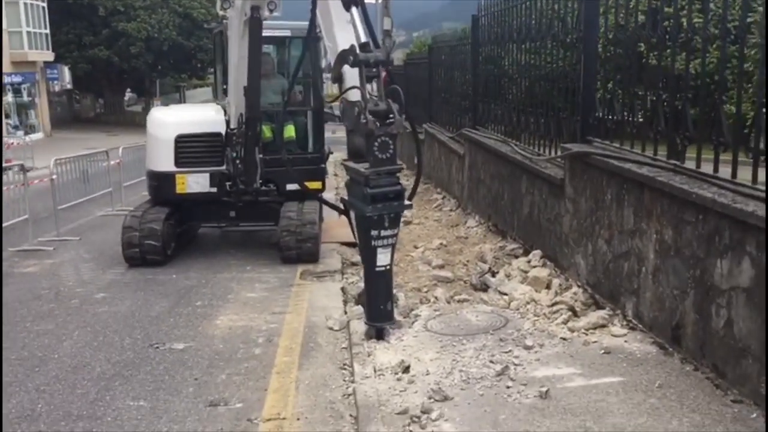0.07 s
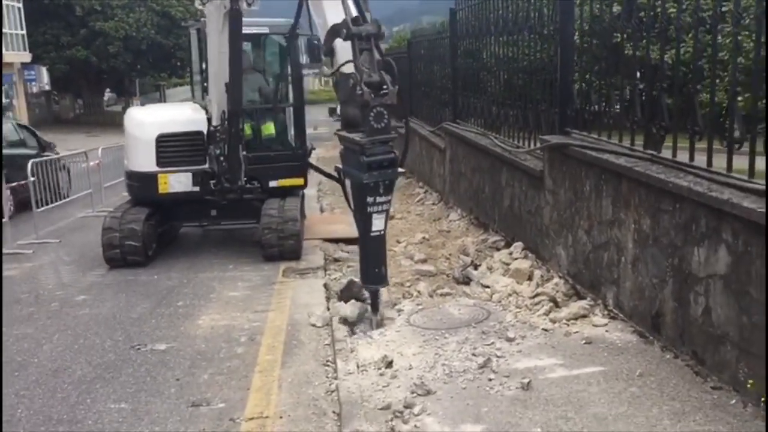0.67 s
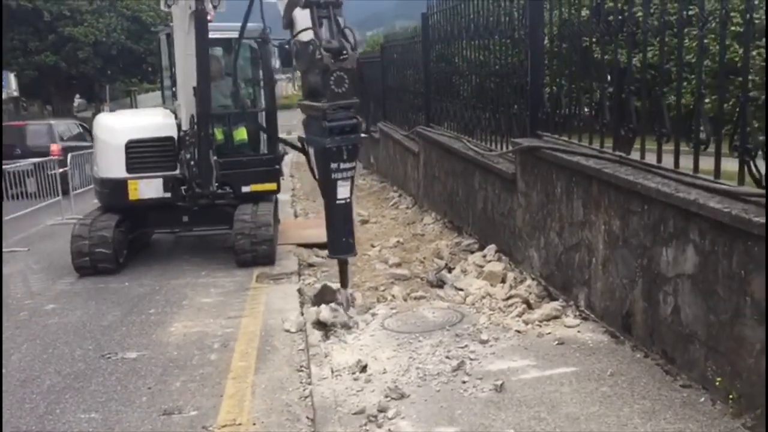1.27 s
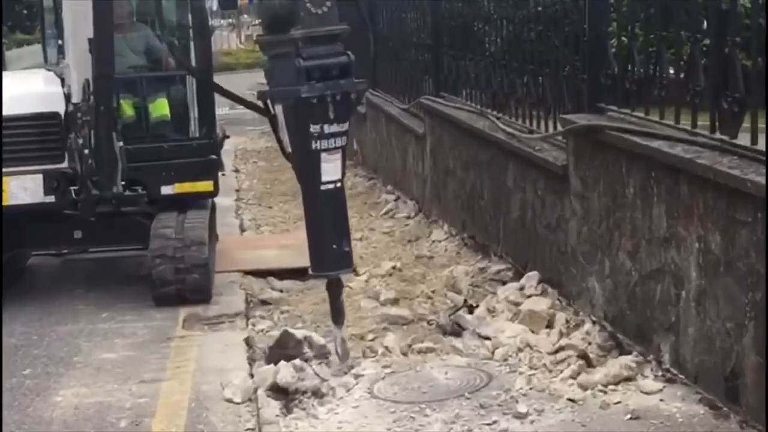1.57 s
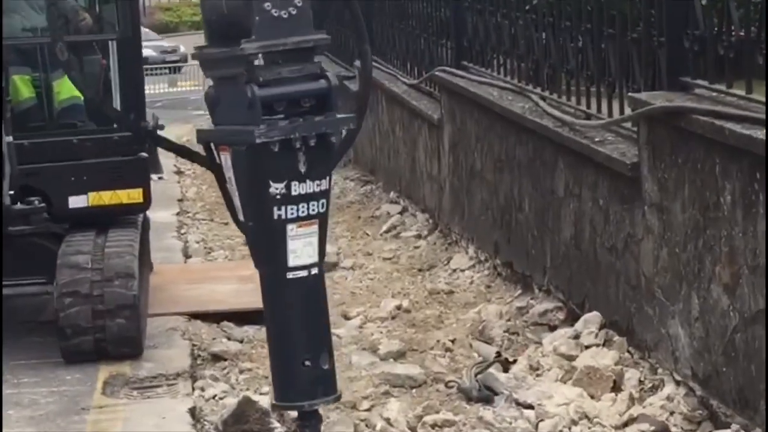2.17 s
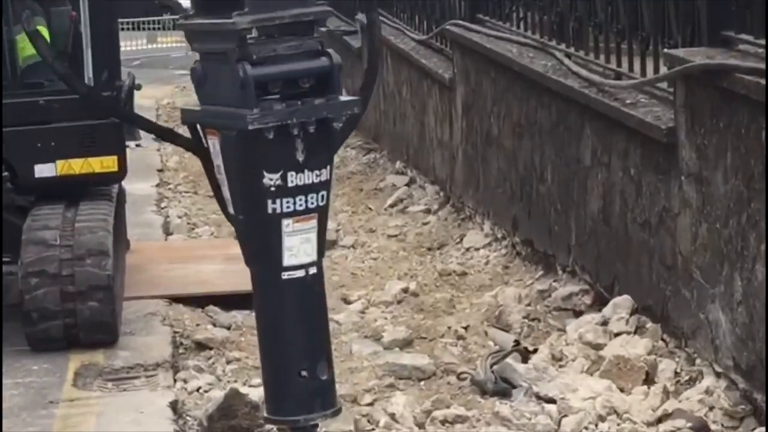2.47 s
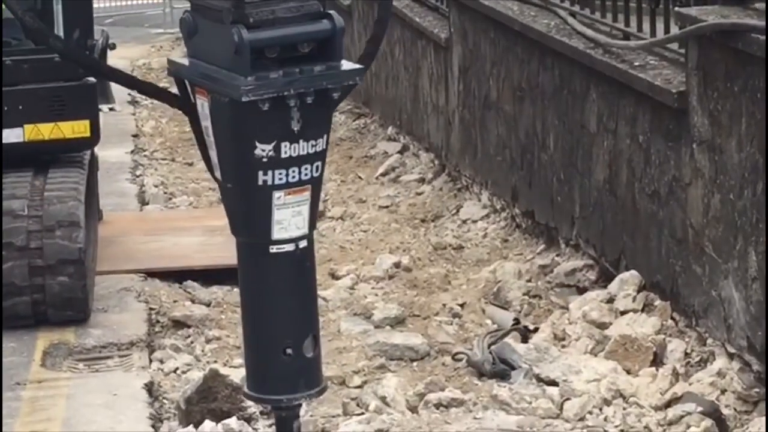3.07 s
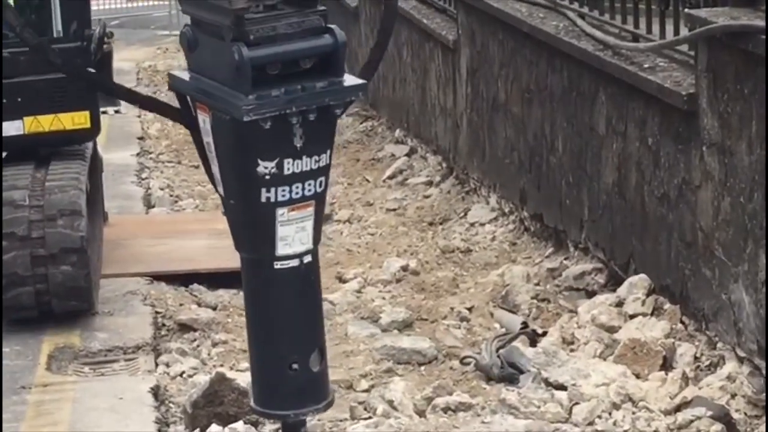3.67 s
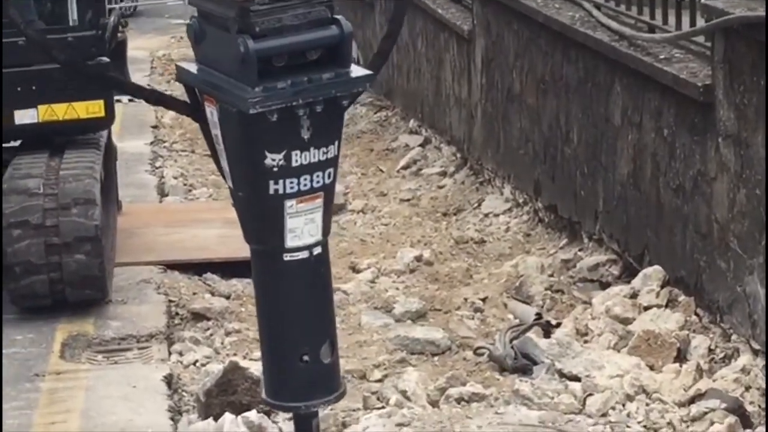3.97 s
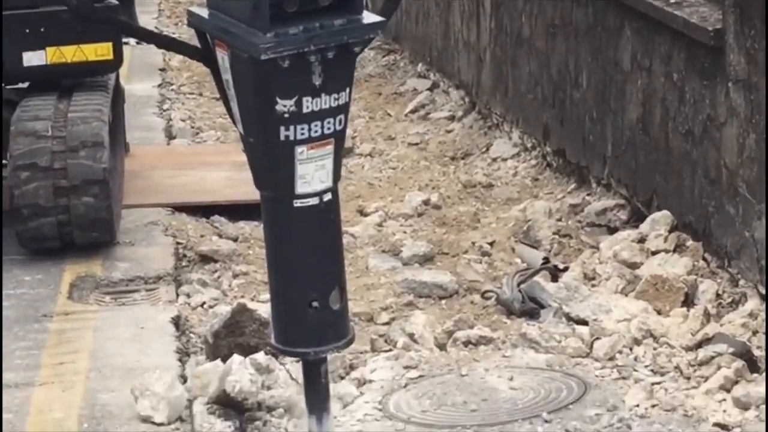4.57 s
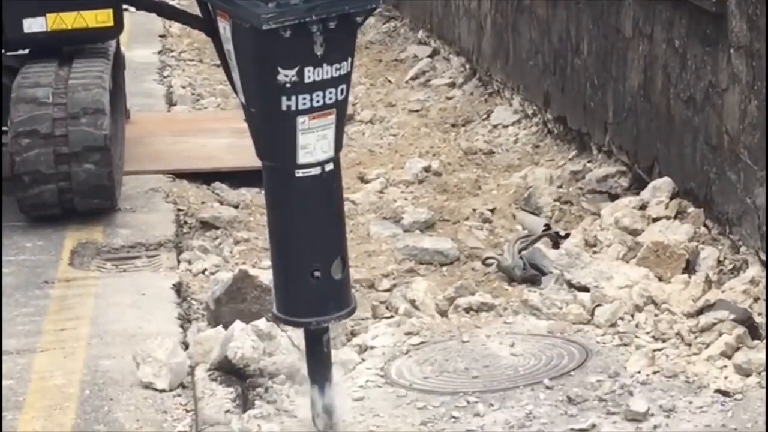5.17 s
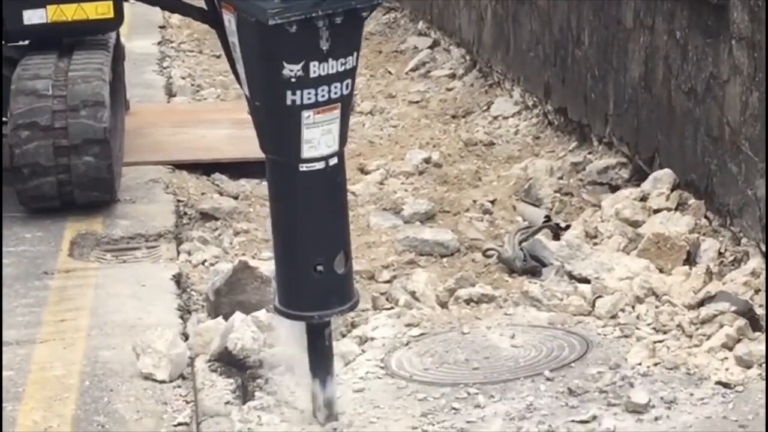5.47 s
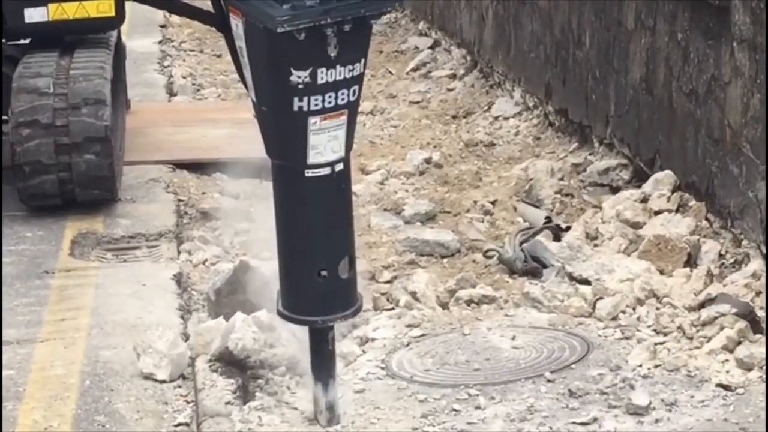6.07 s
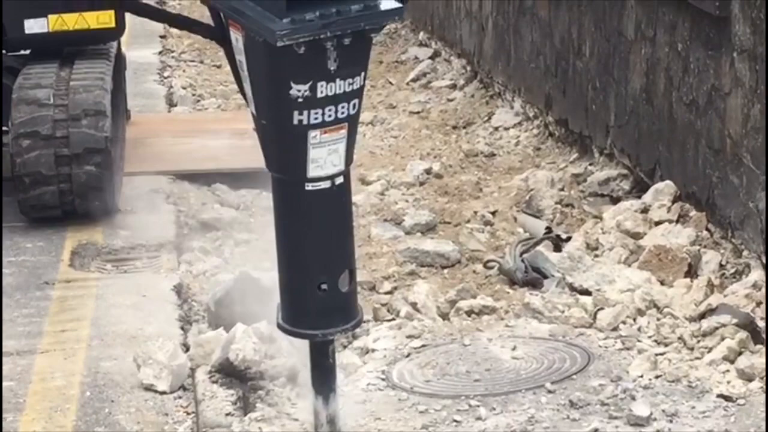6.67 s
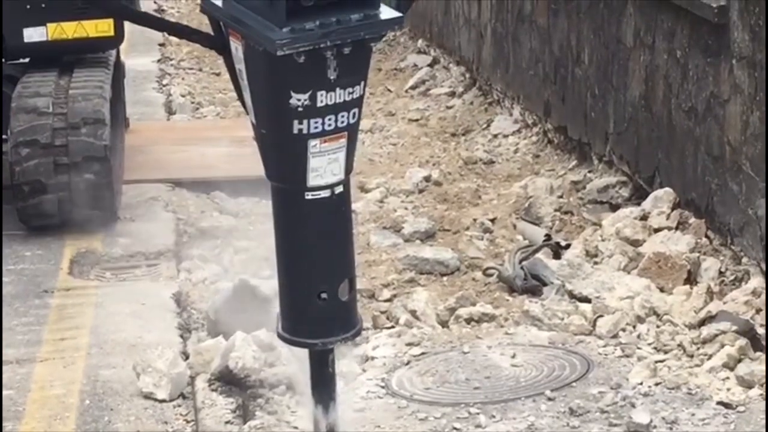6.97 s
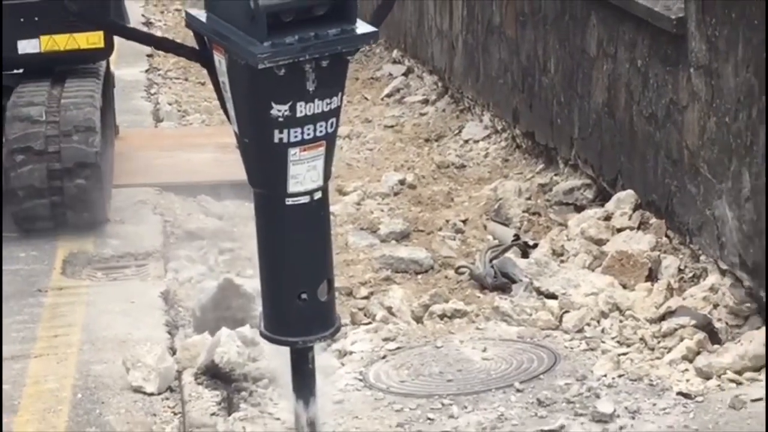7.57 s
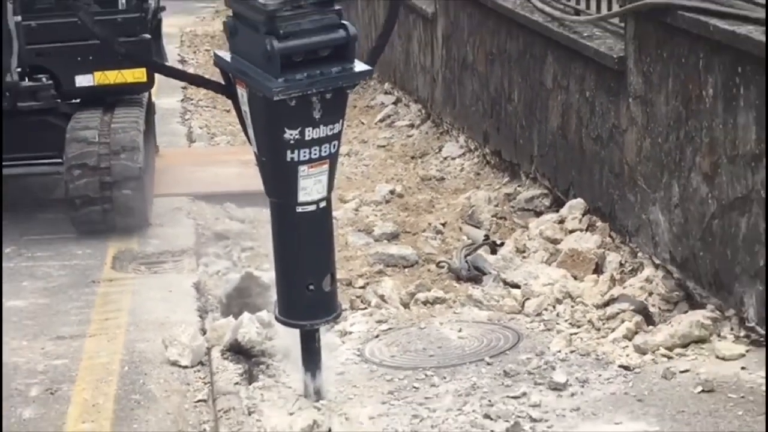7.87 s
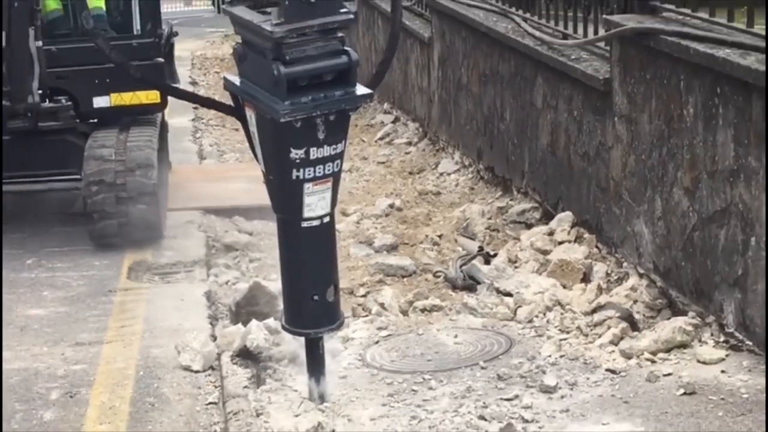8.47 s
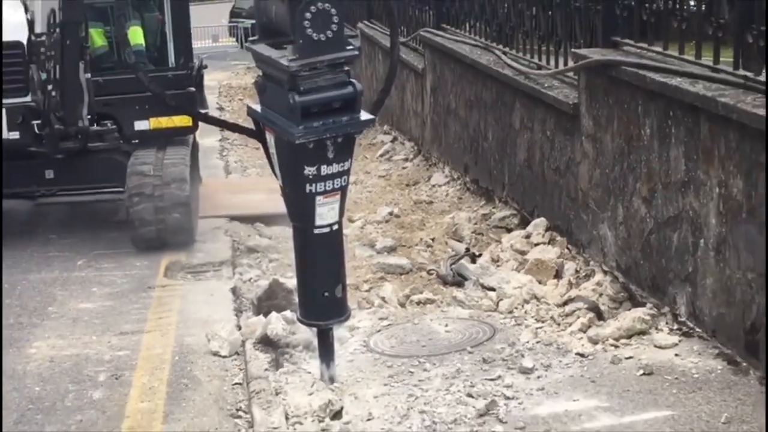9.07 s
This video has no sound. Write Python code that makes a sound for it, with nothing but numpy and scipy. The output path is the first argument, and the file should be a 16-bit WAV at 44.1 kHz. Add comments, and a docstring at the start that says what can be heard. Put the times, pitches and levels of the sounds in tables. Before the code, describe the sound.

Low diesel idle and a few scrapes and knocks of stone give way to a hydraulic breaker pounding pavement in an echoing street.

```python
"""A street between house fronts, one microphone a few metres in front of a small excavator.
The diesel idles while a car rolls by, its brake squealing faintly. The hydraulic breaker nudges rubble
aside and sets its chisel down, then hammers the pavement about 14 times a second, each blow nearly like
the last: a thump, a clatter of the housing, ringing steel. The ring changes as the chisel works from
the crust through a crack into the bed; a wall and the house fronts throw the blows back."""
import sys
import numpy as np
from scipy import signal
from scipy.fft import rfft, irfft, next_fast_len
from scipy.io import wavfile

SR = 44100
rng = np.random.default_rng(int(sys.argv[2]) if len(sys.argv) > 2 else 0)


def generate_wav(sig):
    """Save sig (samples, or channels by samples) to the path in sys.argv[1] as 16-bit PCM at SR."""
    pcm = np.round(np.clip(np.atleast_2d(sig).T, -1, 1) * 32767).astype(np.int16)
    wavfile.write(sys.argv[1], SR, pcm)


N = 411453
TIME = np.arange(N) / SR


def from_db(db):
    """Decibels to gain."""
    return 10 ** (np.asarray(db) / 20)


def rms_one(x):
    """Scale to rms 1."""
    return x / np.sqrt(np.mean(x ** 2) + 1e-20)


def add(out, s, sound):
    """Mix a sound in at time s."""
    at = int(round(s * SR))
    out[at:at + len(sound)] += sound[:N - at]


def dying(age, t60):
    """Falls 60 dB in t60, silent before age 0."""
    return from_db(-60 * np.maximum(age, 0) / t60) * (age >= 0)


def ring(age, hz, t60):
    """A struck mode."""
    return np.sin(2 * np.pi * hz * age) * dying(age, t60)


def swell(start_s, hold_s, t60, attack_s=0.0061):
    """Envelope of a short rise, a hold and a dying release."""
    rise = np.clip((TIME - start_s) / attack_s, 0, 1)
    return rise * dying(np.clip(TIME - start_s - hold_s, 0, 3 * t60), t60)


def coloured(x, spectrum):
    """Minimum-phase filter shaped by (frequency [Hz], level [dB]), rolling off below the first row."""
    size = 2 * next_fast_len(len(x) // 2 + 512)
    hz, db = np.transpose(spectrum)
    f = np.maximum(np.fft.rfftfreq(size, 1 / SR), 1)
    gain = from_db(np.interp(np.log(f), np.log(hz), db)) / (1 + (hz[0] / 2 / f) ** 2)
    cepstrum = irfft(np.log(gain))
    cepstrum[1:size // 2] *= 2
    cepstrum[size // 2 + 1:] = 0
    return irfft(rfft(x, size) * np.exp(rfft(cepstrum)))[:len(x)]


def narrow_noise(hz, width_hz):
    """Noise twice through one resonance; rms 1."""
    b, a = signal.iirpeak(hz, hz / width_hz, fs=SR)
    return rms_one(signal.lfilter(b, a, signal.lfilter(b, a, rng.standard_normal(N))))


def at_time(curve, s):
    """Value of a curve at time s."""
    return np.interp(s, *np.transpose(curve))


def at_stage(columns, stage):
    """Blend three level columns by the chisel's stage: 0 on the crust, 1 cracking, 2 wedged in the bed."""
    return columns @ np.maximum(1 - abs(np.clip(stage, 0, 2) - np.arange(columns.shape[1])), 0)


def excavator(firing_hz=49.6, hunting_hz=1.0, tone_db=-50.5, noise_db=-46.5, cover_db=-58, throb=0.16,
              load_s=3.98, load_rise_s=0.14, load_db=6.5):
    """Firing tones of the governed diesel; combustion, fan and droning cover throb at the firing rate."""
    # combustion and fan noise: (frequency [Hz], relative level [dB])
    spectrum = [(18, -17), (30, 13), (55, -12), (70, -7), (102, -5), (125, -14), (229, -10), (333, -19),
                (497, -33.5), (863, -26), (1580, -27.5), (1740, -26), (2350, -29), (4630, -54),
                (12000, -60), (15600, -88), (22000, -120)]
    phase = 2 * np.pi * np.cumsum(firing_hz + hunting_hz * narrow_noise(2.6, 3.8)) / SR
    waver_db = narrow_noise(2, 5.9)
    firing = from_db(tone_db + waver_db / 2) * np.sin(phase)
    octave = from_db(tone_db + waver_db) * np.sin(2 * phase)
    noise = coloured(rng.standard_normal(N), spectrum)
    noise = from_db(noise_db) * rms_one(signal.lfilter(*signal.butter(2, 100, "high", fs=SR), noise))
    cover = from_db(cover_db) * narrow_noise(1033, 107)
    load = from_db(load_db * np.clip((TIME - load_s) / load_rise_s, 0, 1))   # the breaker draws oil
    return np.sqrt(2) * (firing + octave) + load * (noise + cover) * (1 + throb * np.cos(phase))


def car_tyres(level_db=-45.5):
    """Tyre noise of the passing car, fading as it leaves."""
    # tyres on the road: (frequency [Hz], relative level [dB])
    spectrum = [(150, 1), (300, 5), (550, -10), (1000, -0.5), (1500, -2.5), (2200, -23), (3200, -51),
                (6000, -35.5), (12000, -61.5)]
    rolling = rms_one(coloured(rng.standard_normal(N), spectrum))
    return from_db(level_db) * swell(0, hold_s=1, t60=3.2) * rolling


def brake_squeal(hz=1470, rise_hz_per_s=170, waver_hz=6, level_db=-41.5, overtone_db=-17):
    """A brake squeals faintly: a rising, unsteady tone with rasping overtones."""
    pressure = swell(0, hold_s=0.095, t60=1)
    phase = 2 * np.pi * np.cumsum(hz + rise_hz_per_s * TIME + waver_hz * narrow_noise(30, 40)) / SR
    overtones = pressure * np.sin(2 * phase) + from_db(-9) * narrow_noise(3900, 1500)
    rasp = 1 + 0.43 * narrow_noise(150, 400)
    return from_db(level_db) * pressure * (np.sin(phase) + from_db(overtone_db) * overtones * rasp)


def drags(relative_width=0.23, grain_db=6.0):
    """Each lump grinds over the pavement in uneven grains around a pitch of its own."""
    # dragged lumps: (centre time [s], half length [s], level [dB], pitch [Hz])
    lumps = [(.6, 0.022, -49, 1900), (0.748, 0.046, -44.5, 1390), (0.98, 0.061, -61, 2150),
             (1.134, 0.014, -37, 2300), (2.372, 0.03, -39, 1140), (2.488, 0.075, -49, 2080),
             (3.07, 0.028, -47, 1230), (3.222, 0.025, -42, 1410)]
    out = np.zeros(N)
    grains = rms_one(from_db(grain_db * narrow_noise(113, 200)))
    for s, half_s, db, hz in lumps:
        envelope = np.exp(-np.minimum(((TIME - s) / half_s) ** 2, 50))
        out += from_db(db) * envelope * narrow_noise(hz, relative_width * hz)
    return out * grains


def knocks(crunch_t60=0.1, tail_db=-22, tail_t60=0.69, rubble_db=-10, pitch_db=-7, treble_follow=0.83):
    """The loose chisel bumps on rubble: a noisy crunch and the dry clack of the lumps."""
    # chisel and stones knocking: (time [s], level [dB], nominal treble [dB], main pitch [Hz])
    hits = [(0.773, -31.5, -46, 1266), (0.967, -26.5, -30, 2130), (1.011, -33, -32, 2090),
            (1.125, -29, -26, 2430), (2.402, -20, -2, 1063), (2.471, -32.5, -13, 1080),
            (2.971, -31.5, -57, 927), (3.038, -32, -17, 980), (3.081, -23, -30, 1350),
            (3.12, -23.5, -36, 1370), (3.211, -31, -20, 1340), (3.647, -21, -40, 1036),
            (3.674, -29.5, -36, 813), (3.825, -32.5, -11, 978)]
    # spectrum of the crunch: (frequency [Hz], level [dB])
    crunch_spectrum = [(100, -5), (350, 3), (600, -9), (1000, 6.5), (1500, -4), (2300, 2.5), (3500, -9.5),
                       (6000, -24.5), (12000, -35)]
    # modes of concrete lumps: (frequency [Hz], level [dB], t60 [s])
    lump_modes = [(1050, -4.5, 0.14), (1370, -11, 0.14), (2150, -23, .07), (2590, -22, 0.061),
                  (3380, -35.5, .04), (5550, -31, 0.074)]
    out, age = np.zeros(N), np.arange(SR // 3) / SR
    hz, db = np.transpose(crunch_spectrum)
    treble = np.clip(np.log2(hz / 2000), 0, 1)
    attack = 1 - np.exp(-age / 0.00065)
    envelope = attack * (dying(age, crunch_t60) + from_db(tail_db) * dying(age, tail_t60))
    for s, hit_db, treble_db, pitch_hz in hits:
        colour = db + treble * treble_follow * (treble_db + 11.5)
        crunch = coloured(rng.standard_normal(len(age)) * envelope, np.c_[hz, colour])
        lumps = sum(from_db(level + rng.normal(0, 3.4)) * ring(age, f * rng.normal(1, 0.034), t60)
                    for f, level, t60 in lump_modes)
        clack = from_db(rubble_db) * lumps + from_db(pitch_db) * ring(age, pitch_hz, t60=0.11)
        add(out, s, from_db(hit_db) * (crunch + clack))
    return out


def valve(level_db=-69):
    """A hydraulic valve gives one thin, high whistle."""
    return from_db(level_db) * swell(2.135, hold_s=0.065, t60=0.25) * narrow_noise(7850, 350)


def bumps():
    """A few soft, low bumps, each a quickly damped tone."""
    # bumps: (time [s], level [dB], pitch [Hz])
    thuds = [(2.213, -24.5, 100), (2.292, -25.5, 100), (6.624, -16, 60), (7.018, -20, 60)]
    out = np.zeros(N)
    for s, db, hz in thuds:
        add(out, s, from_db(db) * ring(TIME[:SR // 4], hz, t60=0.047))
    return out


def grate(level_db=-43, judder_db=3):
    """Steel grates over stone: a narrow, juddering tone."""
    judder = from_db(level_db + judder_db * narrow_noise(26, 60))
    return judder * swell(2.935, hold_s=0.18, t60=0.47) * narrow_noise(1370, 76)


def chisel_on_concrete(width_hz=1300):
    """The chisel is set down with a dull knock; later, concrete gives way in short, bright cracks."""
    # the set-down knock, then two cracks: (time [s], level [dB], centre frequency [Hz], t60 [s])
    bursts = [(3.648, -44, 1050, 0.096), (3.9728, -8.5, 3250, 0.021), (5.67, -24.5, 1900, 0.4)]
    return sum(from_db(db) * narrow_noise(hz, width_hz) * dying(np.minimum(TIME - s, 2), t60)
               for s, db, hz, t60 in bursts)


def blows(blows_per_s=14, unseated_db=-3.5, seating_s=0.59):
    """Every piston blow as (time [s], stage, strength [dB], thump [dB], hardness [dB])."""
    # the piston cycles evenly, its pace shifting a little between runs: (first blow [s], last blow [s])
    runs = [(4.263, 4.4074), (4.4732, 5.4524), (6.2455, 6.3895), (6.4575, 6.8828), (6.9552, 7.241),
            (7.3142, 7.8909), (7.9619, 8.8892), (8.9613, 9.32)]
    # slow blows at the start and as the chisel drops through the crack: (time [s])
    single_blows = [3.9716, 4.0817, 4.182, 5.548, 5.6644, 5.7734, 5.8666, 5.9551, 6.0516, 6.1527]
    # progress of the chisel: (time [s], stage [0 crust, 1 cracking, 2 wedged])
    progress = [(3.9, 0), (5.4, 0), (5.65, 1.33), (6.2, 1.06), (7.0, 1.55), (7.4, 2.23), (9.33, 1.82)]
    # force of the blows: (time [s], level [dB])
    force = [(3.97, -15.5), (4.68, -15.5), (5.31, -15.0), (5.55, -15.5), (5.87, -13.5), (6.15, -15.5),
             (7.03, -14), (8.03, -14.5), (8.5, -15)]
    # hard stone answers brighter and more abruptly: (time [s], hardness [dB])
    hardness = [(3.97, -8.5), (4.5, -11), (4.8, -1), (5.38, -4.7), (5.55, -7), (6.05, -11), (6.4, -6),
                (6.8, -3.7), (7.24, 4), (7.7, -4), (9.32, -1.8)]
    # level of the thump: (crust [dB], cracking [dB], wedged [dB])
    thump_levels = [-21.5, -21.5, -19.5]
    steady = [np.linspace(first, last, 1 + round((last - first) * blows_per_s)) for first, last in runs]
    s = np.sort(np.concatenate([single_blows, *steady]))
    stage = at_time(progress, s)
    strength_db = at_time(force, s) + rng.normal(0, 0.41, len(s))
    unseated = np.exp(-((s - s[0]) / seating_s) ** 2)   # until the boom has pressed the breaker home
    thump_db = np.interp(stage, [0, 1, 2], thump_levels) + unseated_db * unseated
    thump_db += rng.normal(0, 0.06, len(s))
    hardness_db = at_time(hardness, s) + rng.normal(0, 1, len(s))
    return zip(s, stage, strength_db, thump_db, hardness_db)


def blow_envelope(age, rattle_s, release_t60, wall_db, street_db, street_t60, wall_s=0.013):
    """Chatter while the piston is in contact, its echo off the wall, then the tail of the street."""
    direct = dying(np.maximum(age - rattle_s, 0), release_t60)
    wall = from_db(wall_db) * dying(age - wall_s, t60=0.097)
    street = from_db(street_db) * dying(age, street_t60)
    attack = 1 - np.exp(-age / 0.00035)
    return attack * np.sqrt(direct ** 2 + wall ** 2 + street ** 2)


def heave(age, low_cut_hz=75):
    """The thump: the casing jumps, then the ground answers; both are too small to radiate deep bass."""
    # casing and ground: (delay after the blow [s], frequency [Hz], level [dB], t60 [s])
    modes = [(0.0021, 251, 7, 0.014), (0.00711, 133, 11.5, 0.023), (0.0022, 344, 2, 0.045)]
    push = sum(from_db(db) * ring(age - delay, hz, t60) for delay, hz, db, t60 in modes)
    return signal.sosfilt(signal.butter(3, low_cut_hz, "high", fs=SR, output="sos"), push)


def clatter(drive, stage, hardness_db, treble_follow=0.52, low_cut_hz=190):
    """The broad rattle of the housing, brighter on hard stone."""
    # spectrum of the rattle: (frequency [Hz], crust [dB], cracking [dB], wedged [dB])
    spectrum = [(100.0, 11.5, -2, 6.5), (182, -15, -3.5, -3.5), (354, 0, -8.5, -9),
                (452, -14.5, -11.5, -7.5), (663, -8.5, -19, -17.5), (853, -14, -3, -1.5),
                (1330, -2, -16, -18), (1900.0, -9.5, -12, -8.5), (2750, -11.5, -20, -14.5),
                (3830, -21.5, -10, -19), (5000, -14, -24, -9), (6370, -12, -21, -29),
                (9700, -16, -18.5, -26), (12300, -27.5, -29.5, -29.5)]
    bands = np.array(spectrum)
    treble = np.clip(np.log2(bands[:, 0] / 2000), 0, 1)
    colour = at_stage(bands[:, 1:], stage) + treble * treble_follow * hardness_db
    rattle = coloured(drive, np.c_[bands[:, 0], colour])
    return signal.lfilter(*signal.butter(2, low_cut_hz, "high", fs=SR), rattle)


def steel(drive, stage, looseness, scatter_db=2.5, detune=0.013, narrowing=0.89):
    """Chatter sets the steel ringing; a loose chisel shifts each mode's level and pitch on every blow."""
    # chisel and housing: (frequency [Hz], nominal width [Hz], crust [dB], cracking [dB], wedged [dB])
    resonances = [(811.6, 10.8, -3.5, 4, -4), (937.6, 40.4, -3, 4, 2.5), (998, 47, 0, 3.5, -5.5),
                  (1091, 39.4, 6, 6.5, 1.5), (1247, 98, -3.5, -10, -8), (1334.4, 19.6, 6.5, 4, 6.5),
                  (1407, 75, -19, -5, -0.5), (1525, 70, -2, -7, -5.5), (1642, 29, -6.5, -2, -7),
                  (1885, 63, -4.5, -9, -16), (1920, 180, -6.5, -16, -14), (2150, 72, -3, -3, -5.5),
                  (2312, 49, -3, 2, -1), (2900, 120, -8.5, -7.5, -10.5), (3006, 130, -5.5, -9.5, -9),
                  (3750, 55, -10.5, -16, -10.5), (3734, 42, -5, -9, -33), (3990, 158, -8.5, -19.5, -5),
                  (4204, 100, -7.5, -13, -8.5), (4586, 194, -4.5, -14, -3), (4672, 40, 3.5, -1, -9),
                  (5070, 26, -1.5, -9, -9), (5204, 88, -18.5, -16, -3), (6250, 56, -13, -3.5, -15),
                  (6680, 52, -45, -16, -18.5), (7040, 80, -30, -42, -24), (8120, 32, -6.5, -8, -14.5),
                  (8650, 50, -6, -5.5, -13.5), (9150, 59, -42, -11, -21), (10030, 71, -19.5, -37, -19)]
    modes, out = np.array(resonances), 0
    levels = at_stage(modes[:, 2:], stage) + scatter_db * looseness * rng.standard_normal(len(modes))
    pitches = modes[:, 0] * (1 + detune * looseness * rng.standard_normal(len(modes)))
    for k, (hz, width, db) in enumerate(zip(pitches, modes[:, 1], levels)):
        mode = signal.lfilter(*signal.iirpeak(hz, hz / (width * narrowing), fs=SR), drive)
        gain = from_db(db) * np.sqrt(np.pi * width / SR)   # energy grows with the width
        out += (-1) ** k * gain * rms_one(mode)
    return out


def tube(age, stage, swell_s=0.034, scatter_hz=4):
    """The casing tube hums once the chisel bites, its pitch a little different on every blow."""
    # tube modes: (frequency [Hz], t60 [s], crust [dB], cracking [dB], wedged [dB])
    resonances = [(825, 0.54, -40, -12.5, -15.5), (1318, 0.22, -26, -42, -18)]
    modes = np.array(resonances)
    hz = modes[:, :1] + scatter_hz * rng.standard_normal((len(modes), 1))
    hum = from_db(at_stage(modes[:, 2:], stage)) @ ring(age, hz, modes[:, 1:2])
    return hum * (1 - np.exp(-age / swell_s))


def street_rumble(age, level_db=-23, t60=0.36, band_hz=(80, 160), build_s=0.036):
    """The thump lingers between the house fronts as a low rumble."""
    band = signal.butter(4, band_hz, "band", fs=SR, output="sos")
    rumble = rms_one(signal.sosfilt(band, rng.standard_normal(len(age))))
    return from_db(level_db) * rumble * dying(age, t60) * (1 - np.exp(-age / build_s))


def breaker(crust_renewal=0.31, wedged_renewal=0.15, grit_db=-12, strike_db=-5,
            contact_s=0.0004, contact_db=7, bounce_s=0.0036, bounce_db=3, bounce_t60=0.043):
    """Each blow rattles the housing in nearly the same pattern, which shifts as the stone gives way."""
    out, age = np.zeros(N), np.arange(SR // 3) / SR
    # the chisel rebounds in its bushing: a hard first contact, then a quick row of smaller ones
    first_contact = from_db(contact_db) * dying(age - contact_s, t60=0.005)
    bounces = dying((age - contact_s) % bounce_s, t60=0.0012) * dying(age, bounce_t60)
    contacts = 1 + from_db(bounce_db) * bounces
    stone_envelope = contacts * blow_envelope(age, rattle_s=0.012, release_t60=0.06,
                                              wall_db=-8.5, street_db=-14, street_t60=1.0)
    steel_envelope = contacts * blow_envelope(age, rattle_s=0.005, release_t60=0.025,
                                              wall_db=-7, street_db=-18, street_t60=0.5)
    strike = from_db(strike_db) * rms_one(1.0 * (age == 0))   # the piston hits every mode at once
    pattern, thump = rng.standard_normal(len(age)), heave(age)
    for s, stage, strength_db, thump_db, hardness_db in blows():
        renewal = np.interp(stage, [0, 2], [crust_renewal, wedged_renewal])
        pattern = np.sqrt(1 - renewal) * pattern + np.sqrt(renewal) * rng.standard_normal(len(age))
        chatter = pattern + from_db(grit_db) * rng.standard_normal(len(age))   # freshly crushed stone
        stone_drive = rms_one(chatter * (stone_envelope + first_contact * from_db(hardness_db)))
        rattle = clatter(stone_drive, stage, hardness_db)
        rings = steel(strike + rms_one(chatter * steel_envelope), stage, looseness=np.sqrt(renewal))
        blow = rattle + rings + tube(age, stage) + street_rumble(age)
        add(out, s, from_db(strength_db) * blow + from_db(thump_db) * thump)
    return out


def scene():
    """The street in mono, from a few metres in front of the breaker."""
    background = excavator() + car_tyres() + brake_squeal()
    handling = drags() + knocks() + valve() + bumps() + grate()
    return (background + handling + chisel_on_concrete() + breaker())[None]


def record(dry, low_cut_hz=38, roll_off_hz=11600, cutoff_hz=12200):
    """The microphone drops the deepest bass, the highest peaks are rounded and the top is cut."""
    sound = signal.sosfilt(signal.butter(4, low_cut_hz, "high", fs=SR, output="sos"), dry)
    sound = signal.sosfilt(signal.butter(8, roll_off_hz, fs=SR, output="sos"), np.tanh(sound))
    return signal.sosfilt(signal.ellip(10, .3, 80, cutoff_hz, fs=SR, output="sos"), sound)


dry = scene()
out = record(dry)
generate_wav(out)
```